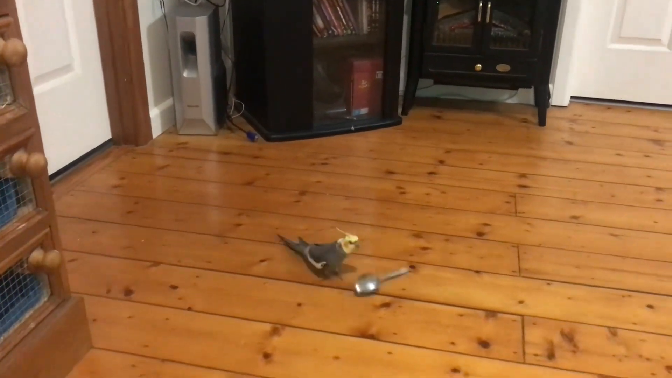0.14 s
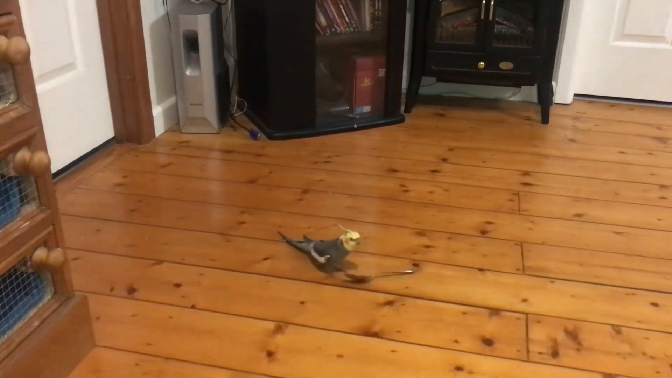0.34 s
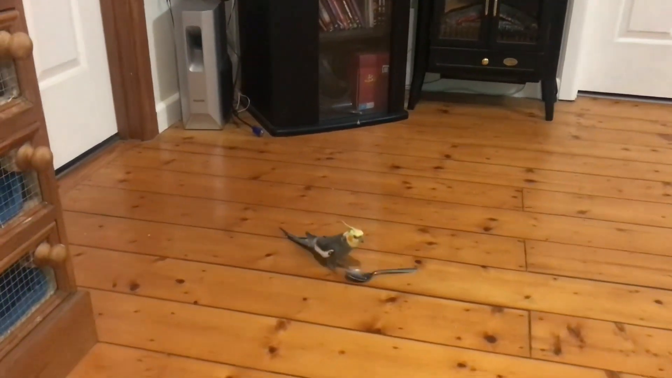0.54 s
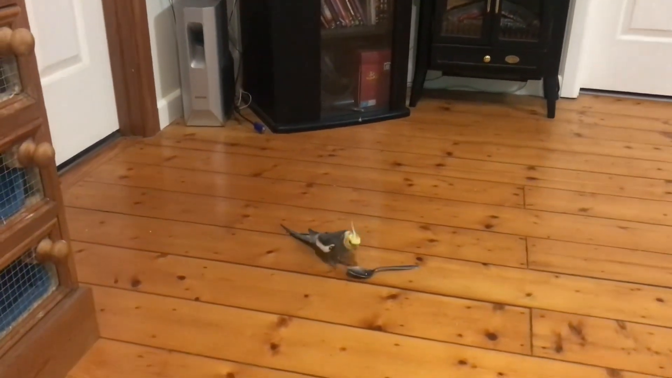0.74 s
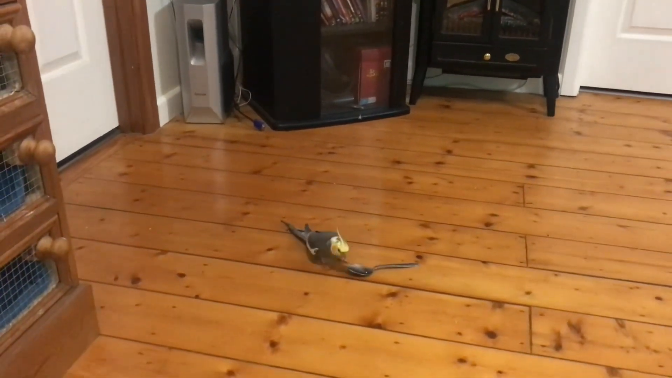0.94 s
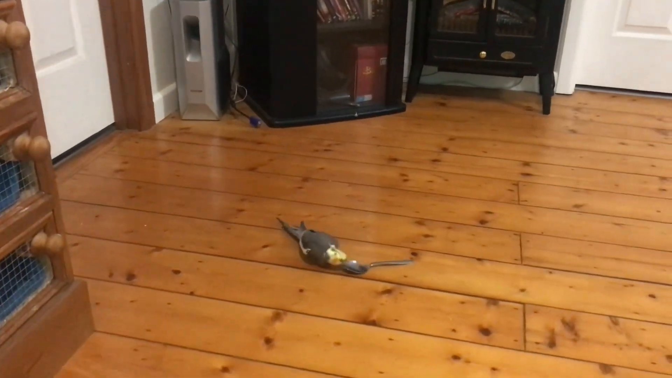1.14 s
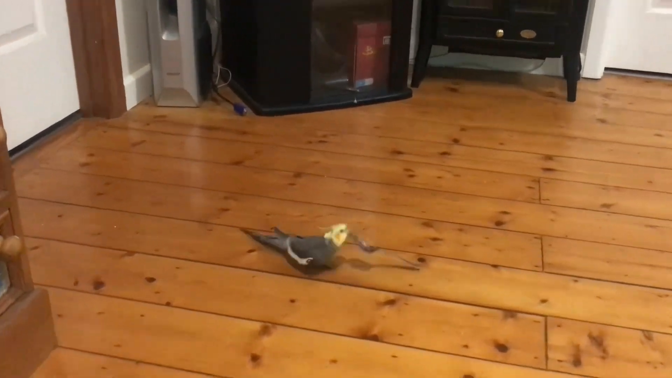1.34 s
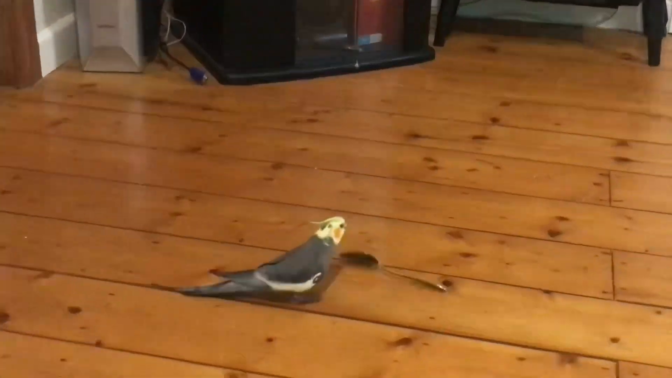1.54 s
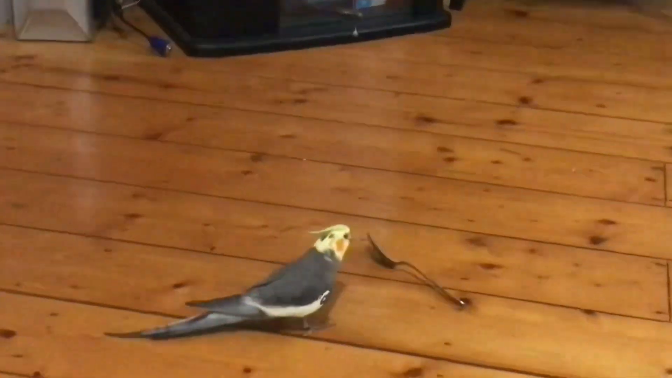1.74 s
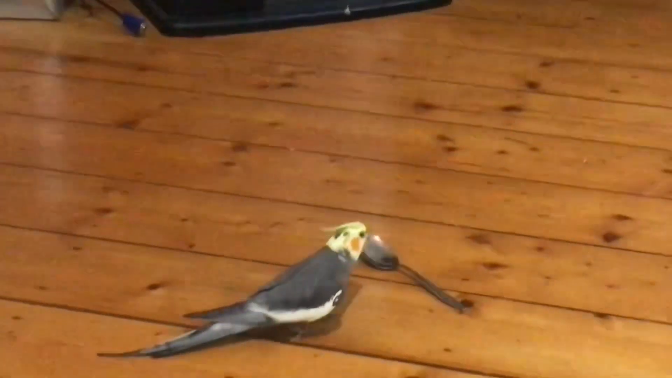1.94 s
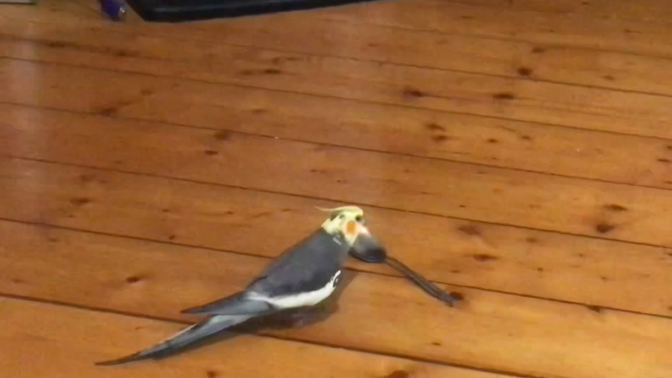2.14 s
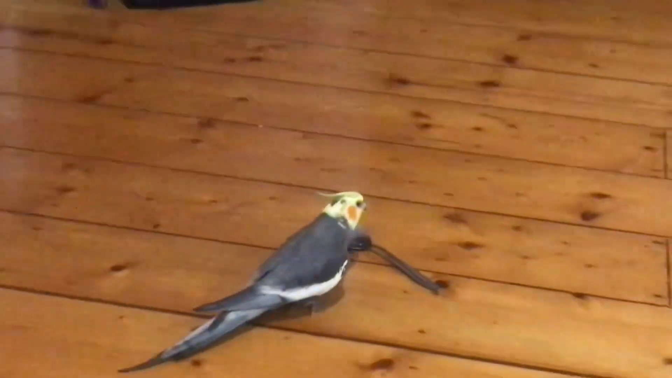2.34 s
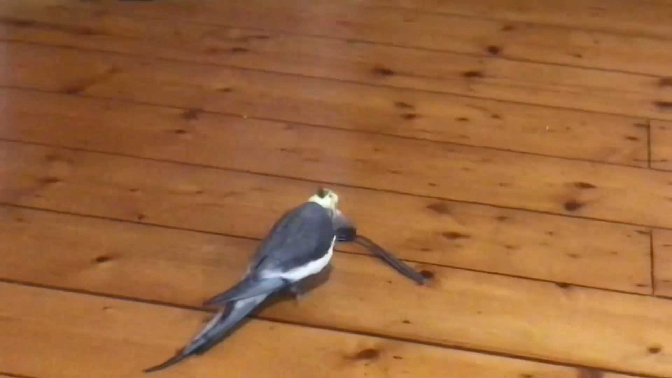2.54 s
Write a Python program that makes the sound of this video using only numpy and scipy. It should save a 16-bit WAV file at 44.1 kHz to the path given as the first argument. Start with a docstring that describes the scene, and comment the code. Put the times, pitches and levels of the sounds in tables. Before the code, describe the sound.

Spoon dropped on a hollow wooden floor at the start and again midway, chattering as it settles; after each, a pet bird gives quick falling and lower arched whistles. Live indoor room, handheld microphone ducking loud moments.

```python
"""A metal spoon drops on a wooden floor twice in a bare, echoing room, with a cockatiel whistling after each.
The boards knock and boom, the spoon clacks, rings and chatters: noise bursts and dying modes.
The bird whistles a two-note phrase softly, then loudly: a quick falling note and a lower arched one,
made from gliding tones with overtones and a noise rasp. A low murmur runs throughout.
Gain control ducks the loud moments."""
import sys
import numpy as np
from scipy import signal
from scipy.fft import rfft, irfft
from scipy.io import wavfile
from scipy.ndimage import uniform_filter1d

SR = 44100
rng = np.random.default_rng(int(sys.argv[2]) if len(sys.argv) > 2 else 0)


def master(y):
    """Save y as 16-bit WAV."""
    cut = np.clip(np.atleast_2d(y).T, -1, 1)
    pcm = np.round(cut * 32767)  # scale
    wavfile.write(sys.argv[1], SR, pcm.astype(np.int16))


N = 112455


def amp(db):
    """Decibels to gain."""
    return 10 ** (np.asarray(db) / 20)


def unit(x):
    """Scales to rms 1."""
    return x / np.sqrt(np.mean(x ** 2) + 1e-20)


def read(points, hz):
    """Reads a table on a log-frequency axis."""
    f, value = np.transpose(points)
    return np.interp(np.log(hz + 1), np.log(f + 1), value)


def add(mix, start_s, sound):
    """Mixes a sound in at start_s."""
    part = mix[round(start_s * SR):][:len(sound)]
    part += sound[:len(part)]


def swell(size, rise_s):
    """Exponential attack with time constant rise_s."""
    return 1 - np.exp(-np.arange(size) / SR / rise_s)


def noise(colour):
    """Steady noise of the given spectrum, rms 1."""
    spectrum = rfft(rng.standard_normal(N))
    return unit(irfft(spectrum * amp(read(colour, np.fft.rfftfreq(N, 1 / SR))), N))


def burst(colour, scatter_t60_s, rise_s):
    """Short impact: flattened noise scatter through a minimum-phase filter of the given spectrum."""
    size = 4096
    t = np.arange(size) / SR
    scatter = rfft(rng.standard_normal(size) * swell(size, rise_s) * amp(-60 * t / scatter_t60_s))
    scatter /= np.sqrt(uniform_filter1d(abs(scatter) ** 2, size=24) + 1e-12)
    log_gain = np.log(amp(read(colour, abs(np.fft.fftfreq(size, 1 / SR)))))
    minimum_phase = np.exp(np.conj(signal.hilbert(log_gain)))
    body = np.fft.ifft(minimum_phase).real[:size // 2]
    out = signal.fftconvolve(irfft(scatter)[:size // 2], body)
    return out / np.linalg.norm(out) * np.sqrt(SR / 100)  # rms 1 if spread over 10 ms


def ring(hz, db, t60_s):
    """Sum of exponentially dying sine modes with random polarity."""
    t = np.arange(SR * 3 // 2) / SR
    phase = rng.choice([0, np.pi], len(hz))
    envelopes = amp(db[:, None] - 60 * t / t60_s[:, None])
    return (envelopes * np.sin(2 * np.pi * hz[:, None] * t + phase[:, None])).sum(0)


def room(x, tail_db, echo_db):
    """Direct sound, a few wall echoes and a diffuse noise tail whose decay depends on frequency."""
    # Tail decay. Each row: frequency in Hz, t60 in seconds.
    tail_t60 = [(60, 1.13), (200, 1.53), (500, 0.85), (1000, 0.89), (2000, 0.8), (3300, 0.55), (6000, .7),
                (9000, 0.21), (15000, 0.82)]
    # Wall echoes. Each row: delay in seconds, level in dB before echo_db is added.
    echoes = [(.0042, -17.5), (.0085, -23.5), (.0185, -21.5), (.025, -18), (.034, -14)]
    onset_s = 0.0027
    hz, t, z = signal.stft(rng.standard_normal(2 * SR), SR, nperseg=512)
    fade = amp(-60 * t / read(tail_t60, hz)[:, None])
    tail = signal.istft(z * fade, SR, nperseg=512)[1]
    tail *= 1 - np.exp(-(np.arange(len(tail)) / SR / onset_s) ** 2)
    response = amp(tail_db) * tail / np.linalg.norm(tail)
    response[0] += 1
    for delay_s, db in echoes:
        response[round(delay_s * SR)] += amp(db + echo_db)
    return signal.fftconvolve(x, response)[:N]


def murmur():
    """Low murmur of the house: steady coloured noise."""
    # Murmur spectrum. Each row: frequency in Hz, relative density in dB per Hz.
    ambience = [(25, -21), (45, 6.5), (70, 3), (110, -6.5), (180, -9), (350, -7.5), (650, -19),
                (1050, -16.5), (2000, -28), (4000, -36), (8000, -41.5), (16000, -44)]
    return amp(-55) * noise(ambience)


def spoon():
    """Each blow knocks the boards, clacks, and rings the spoon's modes according to where it lands."""
    # Blows and the small rocks after them. Each row: start in seconds, board knock in dB, metal clack in dB,
    # clack sharpness in dB per octave above sharp_from_hz, spoon ring in dB,
    # contact point (0 = bowl, 1 = handle), rise in seconds.
    blows = [(.2138, -23.5, -23, -1, -38, 0, .001), (0.2214, -26.5, -27, 3, -46, 0.47, .001),
             (.233, -29, -40, -5, -38.5, 0.43, .002), (.288, -27.5, -37, -8, -61, 0.49, .004),
             (.345, -30, -35, -12, -48.5, 0.12, 0.021), (1.152, -48, -68.5, -5.5, -77.5, 0.67, .003),
             (1.172, -42, -56.5, -2.5, -78, 0.74, .006), (1.186, -49.5, -64.5, -6, -78.5, 0.57, 0.0052),
             (1.5532, -14, -30, 0.5, -50.5, .6, 0.0014), (1.572, -22, -37, -10, -53, .6, .003),
             (1.597, -23, -21, -5.5, -38.5, 0.86, 0.00033), (1.603, -18, -53, -1, -43.5, 0.67, .001),
             (1.662, -36.5, -50, -11, -62, 1, .002), (1.749, -52, -36, 1, -51.5, 0.38, .004),
             (1.80, -57, -38, -10, -43.5, 1, .012), (1.868, -34, -33.5, -2, -51, 1, .012),
             (1.945, -48, -40, -1, -51.5, 0.53, .012), (1.997, -40.5, -59, -17, -69, 0, .01)]
    # Spoon modes. Each row: frequency in Hz, level struck on the bowl in dB, on the handle in dB, t60 in seconds.
    spoon_modes = [(1046, -5, -2, .5), (2702, -6, -11, .3), (3341, 2, 11, .42), (4177, -14, -18, .4),
                   (5354, -10, -9, .8), (6167, -1, -12, .85), (8464, -7, -15, .45), (8610, -7, -22, .4),
                   (9704, -9, -15, .45), (10250, -22, -27, .45), (11400, -15, -30, .4),
                   (12120, -23, -26, .45), (12651, -18, -30, .45), (13767, -25, -31, .4),
                   (14950, -23, -28, .3)]
    # Floorboard modes. Each row: frequency in Hz, level in dB, t60 in seconds.
    board_modes = [(71.84, -16.5, 0.91), (180.3, -8, 0.74), (295, -15, 0.39), (419, -16.5, 0.36),
                   (702, -16.5, 0.1), (830, -19.5, 0.54), (945, -12.5, 0.22), (1177, -18.5, .4)]
    # Knock and clack spectra. Each row: frequency in Hz, relative density in dB per Hz.
    knock_colour = [(40, -38.5), (80, 1), (130, -8.5), (280, 1.5), (500, -9), (800, 3.5), (1050, 5.5),
                    (1400, -8), (2000, -8), (3000, -28), (6000, -61), (16000, -75)]
    clack_colour = [(200, -14.5), (900, 4.5), (1600, 6), (2200, -2), (2800, 5), (3600, 0), (4800, -8.5),
                    (7000, -18), (10000, -33.5), (16000, -29.5)]
    knock_t60_s, clack_t60_s, sharp_from_hz = 0.036, 0.028, 4000
    twin_low_hz, twin_high_hz, twin_db = -22.932, 20.286, -5  # each mode has a close twin, so it beats
    board_db = -6.5  # re the knock
    knocks, rings, boards = np.zeros((3, N))
    hz, bowl_db, handle_db, t60_s = np.transpose(spoon_modes)
    for start_s, knock_db, clack_db, sharpness, ring_db, point, rise_s in blows:
        sharpened = [(f, db + sharpness * max(np.log2(f / sharp_from_hz), 0)) for f, db in clack_colour]
        knock = amp(knock_db) * burst(knock_colour, knock_t60_s, rise_s)
        clack = amp(clack_db) * burst(sharpened, clack_t60_s, rise_s)
        add(knocks, start_s, knock + clack)

        mode_db = ring_db + bowl_db + point * (handle_db - bowl_db)
        twin_hz = hz + rng.uniform(twin_low_hz, twin_high_hz, len(hz))
        metal = ring(hz, mode_db, t60_s) + ring(twin_hz, mode_db + twin_db, t60_s)
        add(rings, start_s, metal * swell(len(metal), rise_s))

        wood = amp(knock_db + board_db) * ring(*np.transpose(board_modes))
        add(boards, start_s, wood * swell(len(wood), rise_s))
    boom = room(boards, tail_db=-2.5, echo_db=-17)
    contacts = room(knocks + chatter(), tail_db=-4, echo_db=0)
    return boom + contacts + room(rings, tail_db=-4, echo_db=-6)


def chatter():
    """Spoon rocking on the boards as it settles: dense random ticks, each a short coloured burst."""
    # Chatter spells. Each row: start in seconds, end in seconds, starting level in dB, fade in dB per second.
    chatters = [(0.264, 0.597, -36, 8.5), (1.687, 2.04, -41, 15.5)]
    # Tick spectrum. Each row: frequency in Hz, relative density in dB per Hz.
    tick_colour = [(40, -25), (80, 5), (130, -13.5), (300, 5), (520, -5.5), (950, 4), (1600, -2),
                   (2200, -4), (3200, -10), (4500, -17.5), (7000, -40.5), (16000, -60)]
    ticks_per_s, tick_low_db, tick_high_db = 220, -9.36, 4.4
    t = np.arange(N) / SR
    ticks = (rng.random(N) < ticks_per_s / SR) * rng.choice([-1, 1], N)
    ticks = ticks * amp(rng.uniform(tick_low_db, tick_high_db, N))
    level = np.zeros(N)
    for start_s, end_s, db, fade_db_per_s in chatters:
        level += (t > start_s) * (t < end_s) * amp(db - fade_db_per_s * np.maximum(t - start_s, 0))
    tick = burst(tick_colour, scatter_t60_s=0.028, rise_s=0.00067)
    return signal.fftconvolve(unit(ticks) * level, tick / np.linalg.norm(tick))[:N]


def whistle(note):
    """A gliding tone with wavering pitch and fluttering level; overtones are strongest near one pitch."""
    # Overtones. Each row: multiple of the pitch, level in dB at overtone_peak_hz.
    overtones = [(2, -27), (3, -37), (4, -50.5), (5, -51.5)]
    overtone_peak_hz, overtone_fall_db_per_oct = 3630, 29
    waver_rms, soft_waver_rms, soft_below_db = 0.0039, 0.018, -37.5  # waver as a fraction of pitch
    flutter_rms_db, flutter_cutoff_hz, edge_s = 2.5, 92.5, 0.0013
    s, hz, db = np.transpose(note)
    t = np.arange(s[0], s[-1], 1 / SR)
    level_db = np.interp(t, s, db)
    lowpass = signal.butter(2, flutter_cutoff_hz, fs=SR, output="sos")
    slow = signal.sosfilt(lowpass, rng.standard_normal((2, N)))
    waver, flutter = (unit(v)[:len(t)] for v in slow)

    # soft notes are less steady in pitch
    unsteady = waver_rms + soft_waver_rms / (1 + amp(level_db - soft_below_db) ** 2)
    glide = uniform_filter1d(np.interp(t, s, hz), size=260, mode="nearest")
    pitch_hz = glide * (1 + unsteady * waver)
    phase = 2 * np.pi * np.cumsum(pitch_hz) / SR
    overtone_gain = amp(-overtone_fall_db_per_oct * abs(np.log2(pitch_hz / overtone_peak_hz)))
    harmonics = sum(amp(k_db) * np.sin(round(k) * phase) for k, k_db in overtones)
    tone = np.sin(phase) + overtone_gain * harmonics
    edges = np.clip(np.minimum(t - t[0], t[-1] - t) / edge_s, 0, 1)
    return s[0], tone * amp(level_db + flutter_rms_db * flutter) * edges


def bird():
    """Whistled notes, with a puff of coloured noise as an airy rasp opening each loud falling note."""
    # One curve per note. Each row: time in seconds, pitch in Hz, level in dB.
    notes = [
        [(.388, 4600, -38), (.398, 3810, -50), (.409, 3380, -29.5), (.42, 2880, -50)],
        [(.52, 1410, -50), (.545, 1574, -32.5), (.575, 1563, -42), (.62, 1370, -55)],
        [(.675, 3430, -33.5), (.69, 3617, -35.5), (.702, 3595, -19.5), (.712, 3430, -19.5), (.721, 3190, -23),
         (.74, 2730, -21.5), (.752, 2515, -26.5), (.76, 2170, -35.5), (.772, 1540, -34)],
        [(.822, 1136, -50.5), (.86, 1429, -39), (.88, 1720, -40.5), (.9, 1828, -29), (.925, 1787, -33.5),
         (.95, 1691, -35.5), (.97, 1458, -43), (.997, 1140, -45.5)],
        [(1.82, 4489, -37), (1.832, 3970, -36), (1.843, 3280, -34), (1.853, 2880, -41)],
        [(1.96, 1390, -46.5), (1.985, 1597, -36.5), (2.01, 1530, -46), (2.04, 1350, -49)],
        [(2.123, 3280, -46), (2.14, 3650, -32), (2.15, 3790, -20), (2.16, 3688, -18), (2.17, 3373, -16),
         (2.184, 2970, -20), (2.198, 2684, -19.5), (2.208, 1940, -33.5), (2.222, 1520, -36)],
        [(2.288, 1183, -49), (2.32, 1460, -40.5), (2.338, 1713, -36.5), (2.36, 1840, -34.5),
         (2.39, 1759, -32.5), (2.41, 1531, -42.5), (2.432, 1184, -48)],
    ]
    # Rasps. Each row: centre in seconds, standard deviation in seconds, peak level in dB.
    rasps = [(0.682, 0.013, -39.5), (2.131, 0.027, -45)]
    # Rasp spectrum. Each row: frequency in Hz, relative density in dB per Hz.
    rasp_colour = [(1500, 1), (3200, -3.5), (4000, 1.5), (4500, 10), (5200, -10), (6000, 6), (7000, -22),
                   (8200, -4.5), (9700, -51), (11800, -9.5), (13000, -39.5), (16000, -52)]
    t = np.arange(N) / SR
    puffs = sum(amp(db) * np.exp(-.5 * ((t - s) / width_s) ** 2) for s, width_s, db in rasps)
    voice = noise(rasp_colour) * puffs
    for note in notes:
        add(voice, *whistle(note))
    return room(voice, tail_db=-3.5, echo_db=2.5)


def scene():
    """Spoon and bird over the low murmur of the house."""
    return (murmur() + spoon() + bird())[None]


def record(dry):
    """Microphone band limits, and gain control that ducks loud moments and recovers slowly."""
    low_cut_hz, high_cut_hz = 21.6, 15750
    threshold_db, squeeze, recover_db_per_s = -21.5, 0.46, 12.5  # squeeze: dB cut per dB over
    dry = signal.sosfilt(signal.butter(2, low_cut_hz, "high", fs=SR, output="sos"), dry)
    power = signal.lfilter(np.ones(400) / 400, 1, dry[0] ** 2)
    # peak hold that falls at a constant dB rate
    fall_db = np.arange(N) / SR * recover_db_per_s
    held_db = np.maximum.accumulate(10 * np.log10(power + 1e-12) + fall_db) - fall_db
    over_db = np.maximum(held_db - threshold_db, 0)
    ducked = dry * amp(-squeeze * uniform_filter1d(over_db, size=200))
    lowpass = signal.firwin(511, high_cut_hz, window=("kaiser", 9), fs=SR)
    return signal.oaconvolve(ducked, lowpass[None], "same")


dry = scene()
out = record(dry)
master(out)
```